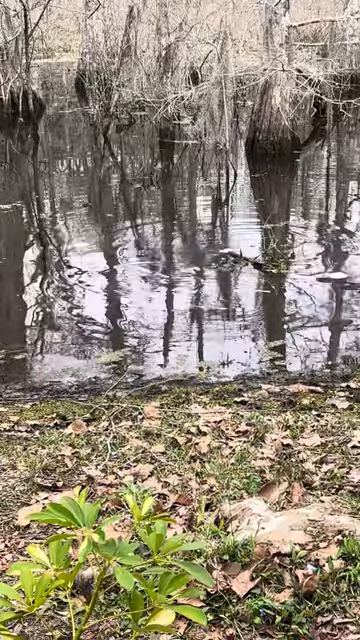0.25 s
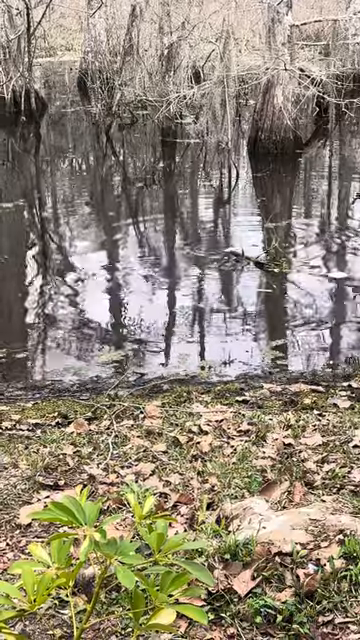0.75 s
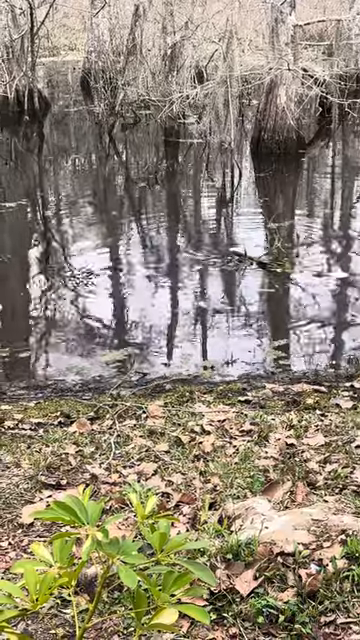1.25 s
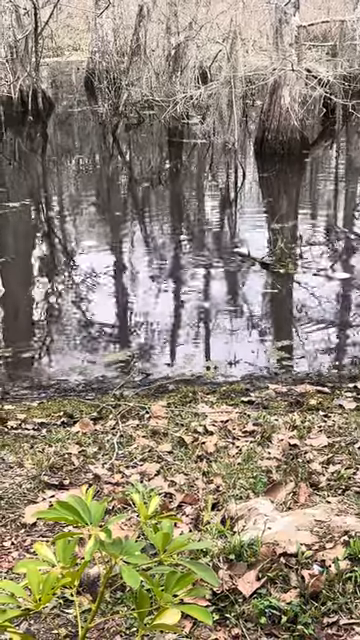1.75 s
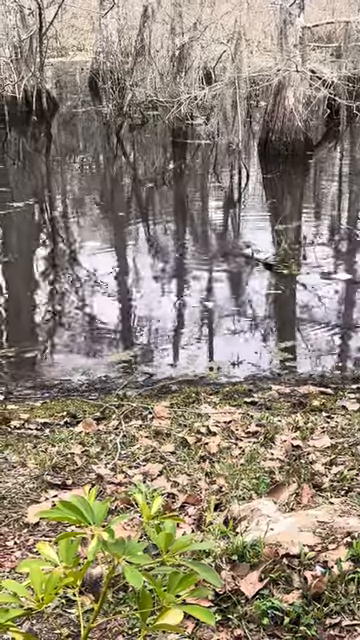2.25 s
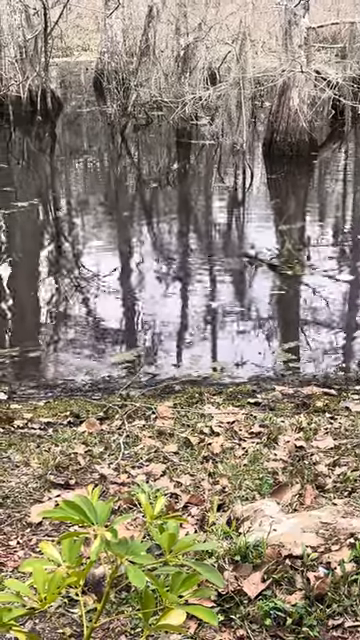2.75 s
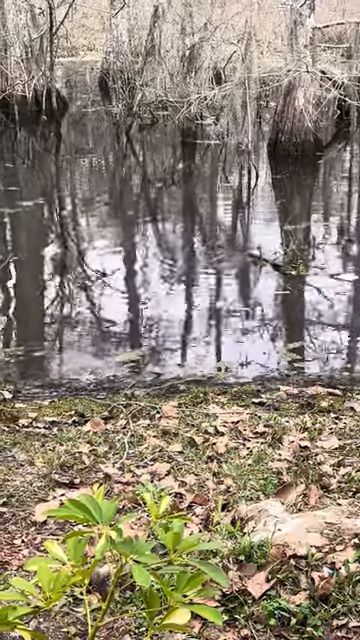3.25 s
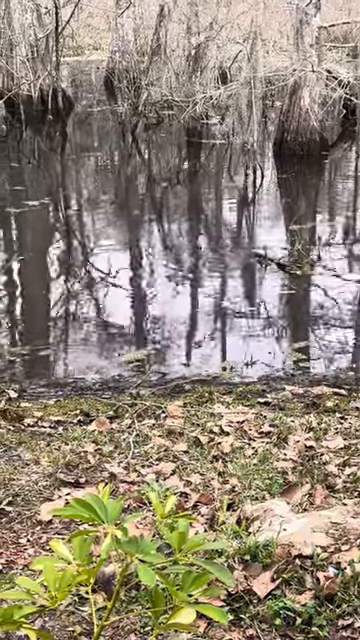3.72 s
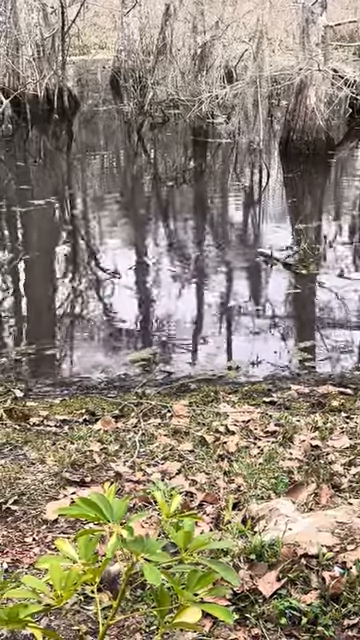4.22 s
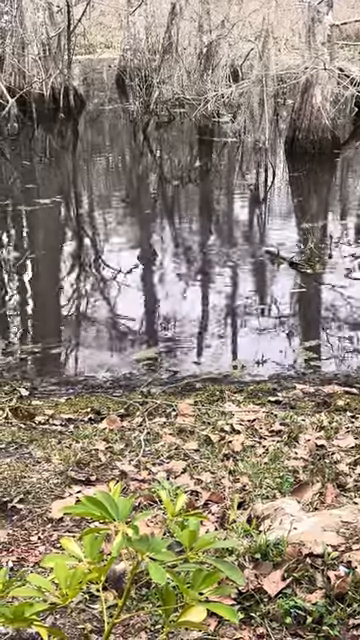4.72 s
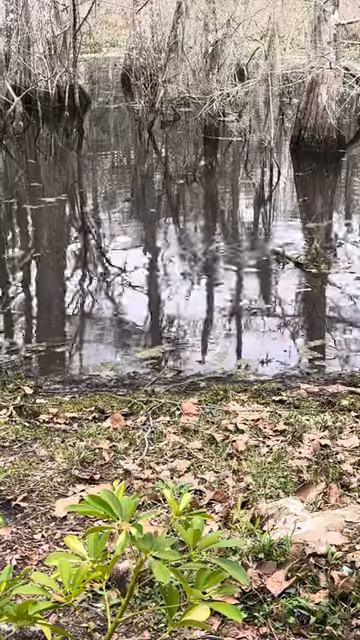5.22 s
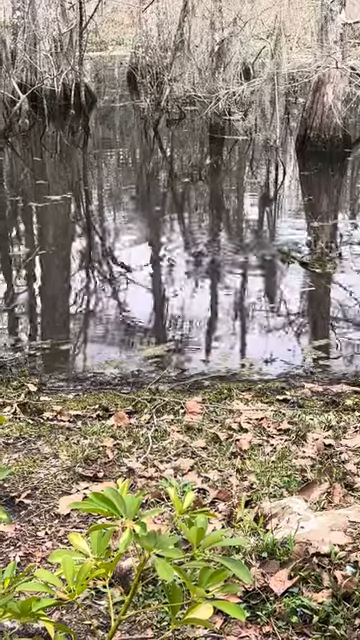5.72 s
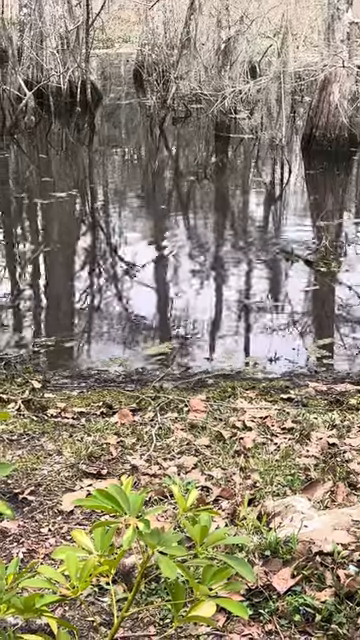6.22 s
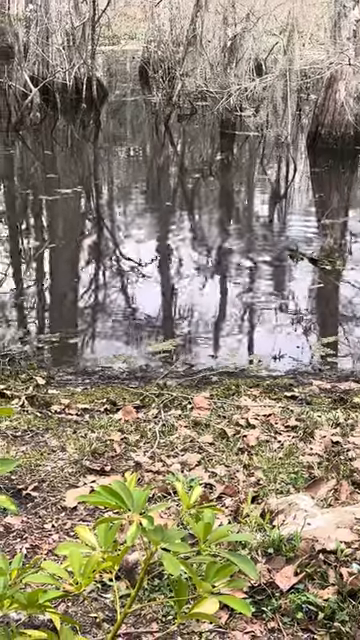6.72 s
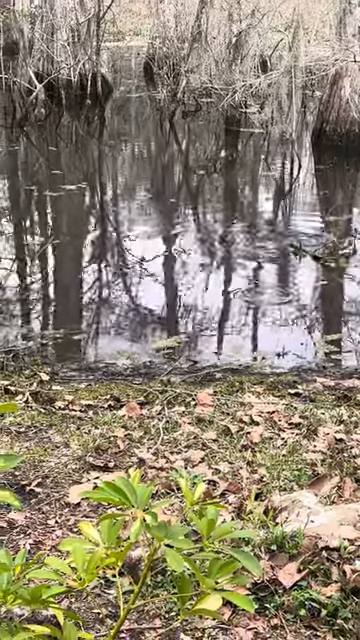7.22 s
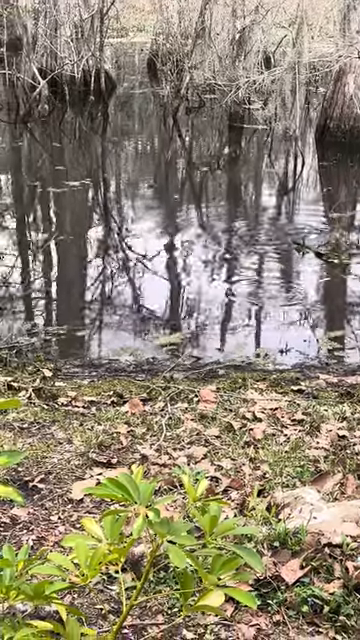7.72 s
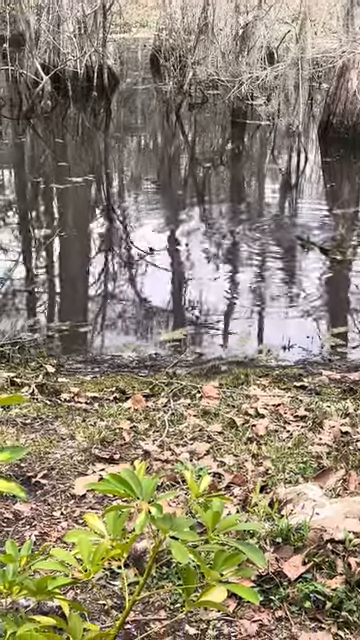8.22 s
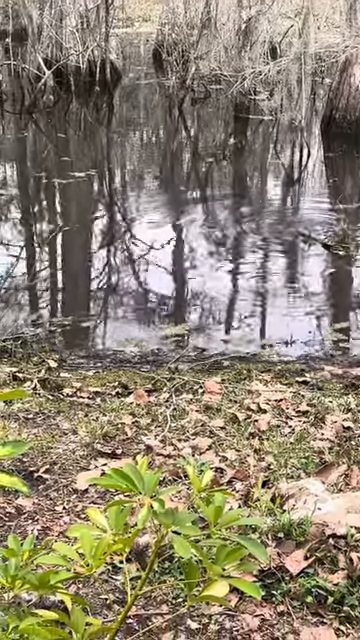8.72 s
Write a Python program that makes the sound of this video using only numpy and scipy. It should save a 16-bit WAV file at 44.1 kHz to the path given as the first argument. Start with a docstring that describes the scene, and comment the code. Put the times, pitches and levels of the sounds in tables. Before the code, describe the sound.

A run of sharp dry snapping clicks close by opens the scene, about five per second, then stops. What remains is quiet: high, creaky double ticks from frogs over water, faint bird whistles with a repeating two-note song, hissy chirps, tiny twig ticks and one small bubble. Low distant road rumble and engine hum lie underneath. Open woodland swamp, small stereo phone microphone, light echo from trunks.

```python
"""A still swamp on a hand-held phone: far traffic rumbles, an engine hums as a wavering sine, air washes as noise.
Frogs blur across the water as sparse pulses in throat rings. Eight close crackling clicks, showers of snaps in a
small body, fill the first 1.5 s among dry twig ticks. Birds whistle as gliding tones, with hissy notes of narrow
noise and two rising chips. From 1.7 s single frogs call in paired rasps, and a two-part song repeats from 2.1 to
4.6 s. At 6.2 s comes a faint tone of narrow noise, then a bubble of rising pitch. Woods scatter echoes back."""
import sys
import numpy as np
from scipy import signal
from scipy.fft import rfft, irfft
from scipy.io import wavfile
from scipy.ndimage import uniform_filter1d

SR = 44100
rng = np.random.default_rng(int(sys.argv[2]) if len(sys.argv) > 2 else 0)


def bounce(signal):
    """Save signal as a 16-bit WAV file at the path given by the first command-line argument."""
    frames = np.transpose(np.atleast_2d(signal))
    limited = np.clip(frames, -1, 1)
    pcm = np.round(limited * 32767).astype(np.int16)
    wavfile.write(sys.argv[1], SR, pcm)


N = 395136


def amp(db):
    """Decibels to gain."""
    return 10 ** (np.asarray(db) / 20)


def evened(x):
    """Scales to rms 1."""
    return x / np.sqrt(np.mean(x ** 2) + 1e-20)


def read(points, hz):
    """Reads a curve over pitch on a log-frequency axis."""
    f, value = np.transpose(points)
    return np.interp(np.log(hz + 1), np.log(f + 1), value)


def add(mix, s, sound):
    """Mixes a sound in at s seconds."""
    part = mix[round(s * SR):][:len(sound)]
    part += sound[:len(part)]


def ring(x, hz, width):
    """A steep resonance of gain 1 at its centre: shift hz down to zero, smooth twice, shift back."""
    turn = np.exp(2j * np.pi * hz * np.arange(len(x)) / SR)
    r = np.exp(-np.pi * width / SR)
    smooth = signal.lfilter([(1 - r) ** 2], [1, -2 * r, r * r], x / turn)
    return 2 * (turn * smooth).real


def noise(spectrum, patchy_db, swell_db):
    """Random short-time spectra with drifting patches and one slow swell, scaled to rms 1."""
    frames, hz = N // 512 + 5, np.fft.rfftfreq(2048, 1 / SR)
    a, b, patches = rng.standard_normal((frames, 1025, 3)).T
    patches = uniform_filter1d(patches, size=20, axis=0)  # across pitch
    patches = evened(uniform_filter1d(patches, size=10, axis=1))  # along time
    swell = evened(uniform_filter1d(rng.standard_normal(frames), size=30))
    level_db = read(spectrum, hz)[:, None] + patchy_db * patches + swell_db * swell
    z = (a + 1j * b) * amp(level_db - 0.0)
    return evened(signal.istft(z, nperseg=2048, noverlap=1536)[1][:N])


def tone(hz, overtone_db=-60):
    """A near-sine along a pitch curve, about rms 1 before its soft start and end."""
    turn = 2 * np.pi * np.cumsum(hz) / SR
    wave = np.sin(turn) + amp(overtone_db) * np.sin(2 * turn)
    return np.sqrt(2) * wave * signal.windows.tukey(len(hz), .6)


def engine_hum():
    """One engine order: a sine that wavers in pitch and level."""
    # far engine: start_s, pitch_hz, level_db
    hum_curve = [(0.0, 147.8, -58), (0.27, 146.7, -54), (0.35, 146, -46), (0.9, 146.5, -55),
                 (1.25, 148.5, -63), (1.54, 152.8, -78), (2.0, 148.7, -55), (4.52, 146.1, -56),
                 (4.91, 149.2, -48.5), (5.19, 148.6, -58.5), (5.96, 148.4, -41), (6.59, 149.3, -52),
                 (7.26, 152, -46.5), (8.48, 152.9, -51.5), (8.68, 148, -55), (8.83, 148.6, -60),
                 (8.96, 144, -51)]
    t = np.arange(N) / SR
    s, hz, db = np.transpose(hum_curve)
    turn = 2 * np.pi * np.cumsum(np.interp(t, s, hz)) / SR
    return amp(np.interp(t, s, db)) * np.sqrt(2) * np.sin(turn)


def traffic():
    """Far road rumble of shaped noise, with the deepest engine note as a narrow band of noise."""
    # rumble loudness: start_s, level_db
    rumble_levels = [(0, -43), (3.32, -43), (3.77, -40), (3.87, -43), (8.46, -41.5), (8.96, -42.5)]
    # rumble spectrum before levelling: pitch_hz, relative_db_per_hz
    rumble_shape = [(15, -53), (25, -18), (39, -7.5), (60, 3), (130, -4), (156, -9.5), (182, -11.5),
                    (221, -16.5), (276, -18.5), (400, -18.5), (520, -58), (880, -120)]
    # deep engine drone: pitch_hz, width_hz, level_db
    deep_note = (60, 14, -51.5)
    hz, width, db = deep_note
    drone = amp(db) * evened(ring(rng.standard_normal(N), hz, width))
    level = amp(np.interp(np.arange(N) / SR, *np.transpose(rumble_levels)))
    return drone + level * noise(rumble_shape, patchy_db=-0.47, swell_db=0.5)


def air_wash():
    """A faint wash of air: shaped noise with patches drifting through it."""
    # wash spectrum before levelling: pitch_hz, relative_db_per_hz
    wash_shape = [(120, -26), (200, 0.5), (302, -11), (504, -7.5), (687, -11), (1050, -19.5), (1990, -35.5),
                  (3150, -35.5), (4290, -37.5), (5100, -46), (7060, -44), (8670, -40), (9770, -48.5),
                  (10800, -68.5), (12000, -77), (15600, -104), (22000, -120)]
    return amp(-52.5) * noise(wash_shape, patchy_db=1.22, swell_db=0.0)


def air_difference():
    """Shaped noise that differs from left to right and widens the air."""
    # left-right spectrum before levelling: pitch_hz, relative_db_per_hz
    wide_shape = [(59, -45), (100, -15), (322, 1), (595, 11.5), (1280, -7.5), (1800, -43.5), (2130, -55.5),
                  (2520, -52.5), (4020, -48), (4290, -34.5), (4770, -33), (5420, -56.5), (7450, -42.5),
                  (10900, -47), (16000, -36.5)]
    return amp(-59) * noise(wide_shape, patchy_db=1.0, swell_db=1.0)


def frogs():
    """Each tick is five uneven pulses into two rings of the vocal sac; a crowd of weaker ticks fills the gaps."""
    # two rasped ticks a call, across the water:
    # start_s, first_level_db, upper_ring_hz, gap_s, second_level_db
    calls = [(1.706, -66, 4750, .029, -58), (1.874, -62, 4200, 0.048, -56),
             (1.991, -56.5, 4600, 0.053, -53.5), (2.124, -59, 4070, .036, -61),
             (2.304, -61, 4650, .036, -56), (2.391, -57.5, 4050, 0.069, -58.5),
             (2.624, -54.5, 4400, 0.042, -51.5), (2.946, -56, 4500, 0.041, -52),
             (3.2, -63, 4150, 0.056, -57), (3.278, -57, 4640, 0.031, -53), (3.416, -56, 4200, .078, -57.5),
             (3.587, -55, 4620, 0.034, -53), (3.761, -63, 4400, .073, -53.5),
             (3.908, -57, 4500, 0.037, -52.5), (4.229, -58, 4540, 0.044, -52.5),
             (4.494, -61, 4030, 0.07, -55), (4.555, -60, 4500, 0.044, -52), (4.771, -59, 4100, .039, -58),
             (4.908, -59, 4600, .033, -56), (5.029, -60, 4030, .059, -57), (5.29, -63, 4040, 0.053, -59),
             (5.486, -57, 4400, 0.052, -58), (5.586, -58.5, 4030, 0.057, -69),
             (5.759, -65, 4100, 0.075, -62), (6.231, -56, 4460, .04, -61), (6.499, -65, 4580, 0.051, -60),
             (6.832, -59.5, 4500, .05, -68), (7.124, -61, 4260, .05, -68), (7.361, -65, 4480, 0.032, -57),
             (7.623, -61, 4400, 0.049, -54.5), (7.852, -57, 4400, .045, -58), (7.95, -62, 4300, .033, -64),
             (8.053, -60.5, 4080, .05, -68), (8.166, -52.5, 4443, .063, -57.5),
             (8.362, -58, 4500, .051, -53.5), (8.464, -59, 4400, .05, -65), (8.589, -58, 4400, 0.041, -53),
             (8.755, -61, 4400, .048, -61), (8.874, -60, 4350, 0.047, -53)]
    # steady blur of all the other frogs: start_s, level_db
    crowd_levels = [(0, -69), (.8, -70.5), (1.6, -69.5), (2.2, -77.5), (2.6, -83), (3.5, -77.5), (4.8, -81),
                    (6, -82), (7.5, -84), (8.96, -82)]
    pulse_s, pulse_fade_db, lower_ring_db = .0055, -2.1, -7
    answer_db, answer_rise_s, answer_t60_s = -14, .015, 0.29  # the crowd flares with each tick and dies away
    out, flare = np.zeros(N), np.zeros(N)
    t, order = np.arange(2000) / SR, np.arange(5)
    after = np.arange(SR // 2) / SR
    answer = np.minimum(after / answer_rise_s, 1) * amp(-60 * after / answer_t60_s) ** 2  # as power
    ticks = []
    for s, db, hz, gap, second_db in calls:
        ticks += [(s, db, hz), (s + gap, second_db, hz)]
    for (s, db, hz), (delay, weakness) in zip(ticks, rng.random((len(ticks), 2, 5))):
        pulses = np.zeros(len(t))
        at = (SR * pulse_s * (order + .6 * delay)).astype(int)
        pulses[at] = amp(pulse_fade_db * order - 6.4 * weakness)
        rings = ring(pulses, hz, 440) + amp(lower_ring_db) * ring(pulses, 3650, 370)
        add(out, s, amp(db) * rings / ring(t == 0, hz, 440).max())
        add(flare, s, amp(db + answer_db) ** 2 * answer)
    pulses = amp(12 * rng.random(N)) * (rng.random(N) < 400 / SR)  # about 400 a second
    crowd = ring(pulses, 4393, 599.3) + ring(pulses, 4080, 500) + amp(-4.5) * ring(pulses, 3600, 450)
    steady = amp(np.interp(np.arange(N) / SR, *np.transpose(crowd_levels)))
    return out + np.sqrt(flare + steady ** 2) * evened(crowd)


def clicks():
    """Each click is a short shower of snaps ringing a small damped body, thinning out into a tail."""
    # close clicks, levels before the fade and bass cut; treble and top are relative to the main ring:
    # start_s, level_db, main_ring_hz, treble_ring_hz, treble_db, top_db, crackle_s, tail_t60_s
    click_rows = [(0.018, -32.5, 2980, 5490, -8.5, -7.5, 0.0055, 0.048),
                  (0.2106, -32.5, 3130, 5550, -5.5, -13.5, 0.0086, 0.058),
                  (0.4362, -38.5, 3090, 7080, 3.5, -1.5, 0.019, 0.071),
                  (0.639, -39, 3100, 6410, 1, -1.5, 0.0033, 0.06),
                  (0.8405, -32.5, 3220, 5760, -5, -15, 0.0051, 0.045),
                  (1.0541, -36.5, 3360, 5680, -3, -11.5, 0.014, 0.061),
                  (1.283, -35.5, 3160, 6700, -5.5, -11, 0.0066, 0.064),
                  (1.4808, -34.5, 3000, 5780, 0, -14.5, 0.011, 0.041)]
    # strongest single snaps inside the clicks, peaks before the bass cut: start_s, peak_db, ring_hz
    snap_rows = [(.0209, -14, 3200), (.0233, -15, 2850), (.0260, -16, 2950), (.2137, -21, 3300),
                 (.2167, -13, 2750), (.2193, -14, 3100), (.4398, -19, 3200), (.4480, -19, 3100),
                 (.4536, -19, 2900), (.6422, -20, 3400), (.6440, -18, 3200), (1.0590, -21, 3300),
                 (1.0634, -21, 3400), (1.0692, -18, 3100), (.8427, -18, 3240), (1.2846, -21, 3400),
                 (1.4846, -19, 3100)]
    # rings of the body common to all clicks: ring_hz, width_hz, relative_db
    body = [(1780, 3200, -9), (2400, 860, -7), (3760, 400, -12), (4400, 510, -7), (15000, 1500, -35.5)]
    out, t = np.zeros(N), np.arange(6000) / SR
    for s, db, hz, treble_hz, treble_db, top_db, length, t60 in click_rows:
        after = np.maximum(t - length, 0)
        tail = amp(-60 * after / t60) + amp(-8 - 60 * t / 0.12)
        fade = tail * np.minimum(t / 0.0016, 1)
        own_rings = [(hz, 550, 0), (treble_hz, 1000, treble_db), (9300, 2200, top_db)]
        for f, width, mode_db in own_rings + body:
            snaps = amp(2.68 * rng.exponential(1, len(t))) * rng.standard_normal(len(t))
            shower = snaps * (rng.random(len(t)) < .2)
            add(out, s, amp(db + mode_db) * evened(ring(shower, f, width)) * fade)
    for s, db, hz in snap_rows:
        snap = ring(t[:400] == 0, hz, 1300)
        add(out, s - .0003, amp(db) * snap / snap.max())  # early, as the ring takes time to peak
    return signal.lfilter(*signal.butter(3, 1080, "high", fs=SR), out)  # a small body radiates no bass


def whistled_notes():
    """All whistles as rows: start_s, length_s, level_db, start_hz, middle_hz, end_hz."""
    # single notes: start_s, length_s, level_db, start_hz, middle_hz, end_hz
    single_notes = [(.122, 0.031, -54.5, 6250, 7900, 8600), (.144, 0.05, -54.5, 8700, 7860, 6270),
                    (.24, 0.051, -59, 5460, 6400, 5460), (1.013, 0.038, -67, 7200, 7200, 7250),
                    (1.56, 0.016, -53.5, 7280, 6720, 6100), (1.584, 0.086, -68.5, 2440, 2230, 2130),
                    (1.655, 0.032, -66, 2100, 2250, 2570), (1.622, .085, -71.5, 5620, 5520, 5500),
                    (2.81, .052, -73, 7530, 7540, 7430), (3.97, 0.032, -74, 8000, 7294, 7060),
                    (4.64, .03, -77, 7200, 7150, 7040), (5.484, 0.044, -71, 7200, 7400, 7300),
                    (6.224, .032, -74, 8000, 7460, 7380), (7.73, 0.041, -74, 7300, 7100, 7000),
                    (8.481, 0.016, -60, 8400, 7200, 5900), (8.51, 0.25, -78.5, 5480, 5410, 5495),
                    (8.895, .065, -71, 5520, 5500, 5440)]
    # a low bird's falling whistles: start_s, length_s, level_db, start_hz
    fall_rows = [(.06, .13, -77, 2280), (0.46, .19, -74, 2280), (0.923, 0.11, -72, 2270),
                 (1.329, 0.19, -69.5, 2370), (1.781, 0.17, -67.5, 2295), (2.22, 0.074, -77, 2150),
                 (2.638, .06, -75, 2120), (3.886, .04, -74, 2020), (4.17, .04, -76, 1900)]
    # repeated two-part song: main_note_s, main_level_db, grace_level_db
    song_rows = [(2.103, -72, -85), (2.51, -71.5, -80), (2.927, -69, -78), (3.327, -65.5, -73),
                 (3.732, -69, -73), (4.135, -69, -73), (4.56, -71, -79)]
    # the high grace note, ending where the main note starts: length_s, start_hz, middle_hz, end_hz
    grace = (.036, 3120, 2990, 2900)
    # the main note, which drops and levels out: length_s, start_hz, middle_hz, end_hz
    main_note = (.05, 2680, 2540, 2510)
    falls = []
    for s, length, db, hz in fall_rows:
        drop_hz = 3400 * length  # 3400 Hz per second
        falls.append((s, length, db, hz, hz - drop_hz / 2, hz - drop_hz))
    graces = [(s - grace[0], grace[0], db, *grace[1:]) for s, _, db in song_rows]
    mains = [(s, main_note[0], db, *main_note[1:]) for s, db, _ in song_rows]
    return single_notes + falls + graces + mains


def whistles():
    """Gliding bird tones, direct and as echo feed; louder whistlers are nearer and drier."""
    direct, echo = np.zeros(N), np.zeros(N)
    for s, length, db, start_hz, middle_hz, end_hz in whistled_notes():
        u = np.linspace(-1, 1, round(length * SR))
        bend = u ** 2 * ((start_hz + end_hz) / 2 - middle_hz)
        arch = middle_hz + u * (end_hz - start_hz) / 2 + bend
        drift = uniform_filter1d(rng.standard_normal(len(u) + 600), size=400, mode="wrap")
        flutter = evened(drift)[:len(u)]
        add(direct, s, amp(db + 3.3 * flutter) * tone(arch))  # leaves and moving air shake the level
        add(echo, s, amp(-78 + 0.7 * (db + 72.5)) * tone(arch))
    return np.array([direct, echo])


def twigs():
    """Tiny dry ticks: brief fading noise through one broad resonance, passed twice."""
    # faint twig ticks, level at the onset: start_s, level_db, centre_hz, width_hz
    twig_rows = [(.533, -50, 3400, 2530), (.535, -52.5, 8200, 2000), (.567, -59, 8440, 1500),
                 (1.163, -60, 8083, 1500), (1.992, -53.5, 2980, 2500), (2.621, -69, 6920, 4000),
                 (4.18, -64, 8530, 3000), (6.714, -55.5, 2860, 2513), (6.813, -61, 8950, 4990),
                 (8.095, -62, 1590, 500), (8.237, -66, 7460, 3020), (8.423, -66, 7700, 1200)]
    out, t = np.zeros(N), np.arange(1500) / SR
    for s, db, hz, width in twig_rows:
        band = ring(ring(rng.standard_normal(len(t)), hz, width), hz, width)
        add(out, s, amp(db - 60 * t / 0.079) * evened(band))
    return out


def buzzes():
    """Hissy bird notes of narrow noise, direct and as echo feed."""
    # level before the soft edges: start_s, level_db, centre_hz, length_s
    buzz_rows = [(1.219, -54.5, 7040, 0.015), (1.35, -62, 6430, 0.07), (1.546, -58, 6750, .012),
                 (1.695, -67, 5960, 0.074), (2.092, -75.5, 7400, .06), (4.73, -77, 6260, 0.086),
                 (4.8, -80.5, 6360, 0.32), (4.972, -83.5, 6830, 0.25), (5.152, -83, 6340, 0.2),
                 (6.186, -69, 5530, 0.013), (6.522, -81, 8200, 0.097), (6.927, -80.5, 7060, 0.088),
                 (8.082, -79, 7100, 0.076), (8.198, -78, 6300, 0.055), (8.494, -59.5, 6430, 0.011),
                 (8.602, -65.5, 6300, .1), (8.766, -69, 7500, .03), (8.822, -64.5, 6600, 0.048)]
    direct, echo = np.zeros(N), np.zeros(N)
    for s, db, hz, length in buzz_rows:
        hiss = ring(rng.standard_normal(round(length * SR)), hz, 980)
        buzz = amp(db) * evened(hiss) * signal.windows.tukey(len(hiss), .5)
        add(direct, s, buzz)
        add(echo, s, amp(-3.0) * buzz)
    return np.array([direct, echo])


def chips():
    """A nearer bird's tones, rising fast and then levelling, with an overtone; direct and as echo feed."""
    # level of the echo feed before the soft edges: start_s, level_db, from_hz, to_hz, length_s
    chip_rows = [(3.139, -60, 6060, 7820, .022), (7.303, -56, 5870, 8040, 0.027)]
    direct, echo = np.zeros(N), np.zeros(N)
    for s, db, from_hz, to_hz, length in chip_rows:
        u = np.linspace(0, 1, round(length * SR))
        rise = to_hz - (to_hz - from_hz) * (1 - u) ** 2.3
        chip = amp(db) * tone(rise, overtone_db=-8)
        add(direct, s, amp(-0.5) * chip)
        add(echo, s, chip)
    return np.array([direct, echo])


def low_tone():
    """A faint fuzzy low tone: noise in a very narrow resonance."""
    # level before the soft edges: start_s, length_s, level_db, pitch_hz
    fuzzy_note = (6.2, .58, -61, 510)
    out = np.zeros(N)
    s, length, db, hz = fuzzy_note
    fuzz = ring(rng.standard_normal(round(length * SR)), hz, 25)
    add(out, s, amp(db) * evened(fuzz) * signal.windows.tukey(len(fuzz), .4))
    return out


def bubble():
    """A bubble in the water whose pitch rises as it nears the surface."""
    # level before the soft edges: start_s, level_db, from_hz, to_hz, length_s
    plop = (6.772, -54, 290, 480, .024)
    out = np.zeros(N)
    s, db, from_hz, to_hz, length = plop
    add(out, s, amp(db) * tone(np.geomspace(from_hz, to_hz, round(length * SR))))
    return out


def woods(x):
    """Trunks scatter sound back: sparse taps of random sign, each band dying at its own speed."""
    # decay of the echo among the trunks: pitch_hz, t60_s
    decay = [(1500, .6), (2500, 0.91), (4300, 0.41), (7500, 0.85), (15000, 0.12)]
    taps = np.zeros(SR)
    at = np.arange(100, SR - 20, 20) + rng.integers(0, 20, (SR - 101) // 20)
    taps[at] = rng.choice([-1., 1.], len(at))
    hz, t, z = signal.stft(taps, SR, nperseg=256)
    fade = amp(-60 * t / read(decay, hz)[:, None])
    tail = signal.istft(z * fade, SR, nperseg=256)[1]
    return signal.fftconvolve(x, tail / np.linalg.norm(tail))[:N]


def scene():
    """Sums the sources; the spacing of the two ports turns into a phase difference between left and right."""
    # left-right difference at two ports a little apart, against the sum: pitch_hz, difference_db
    ports = [(900, -67), (1400, -3.5), (2100, -39), (4000, -50), (4700, -13.5), (5050, 4), (5400, -13.5),
             (5900, -31), (7200, -10.5), (9000, 2), (10800, 4), (12800, 21), (15500, 9.5)]
    direct, echo = whistles() + buzzes() + chips()
    chorus = frogs()
    near = clicks() + twigs()
    scattered = woods(amp(-30) * near + echo + amp(-5.0) * chorus)
    sound = near + direct + chorus + scattered + low_tone() + bubble()
    sound += engine_hum() + traffic() + air_wash()
    ratio = amp(read(ports, np.fft.rfftfreq(N, 1 / SR)))
    spectrum = rfft(sound) / np.sqrt(1 + ratio ** 2)  # what the difference gains, the sum loses
    mid = irfft(spectrum, N)
    side = irfft(-1j * ratio * spectrum, N)
    side += air_difference()
    side -= amp(-4.5) * ring(near, 1300, 800)  # the close source is off to the right; its lower ring shows it
    return np.array([mid + side, mid - side])


def record(dry):
    """The small microphone loses the deepest bass; then the band limit of the recorder."""
    thinned = signal.sosfilt(signal.butter(4, 38, "high", fs=SR, output="sos"), dry)
    band_limit = signal.firwin(511, 15900, window=("kaiser", 9), fs=SR)
    return signal.oaconvolve(thinned, band_limit[None], "same")


dry = scene()
out = record(dry)
bounce(out)
```